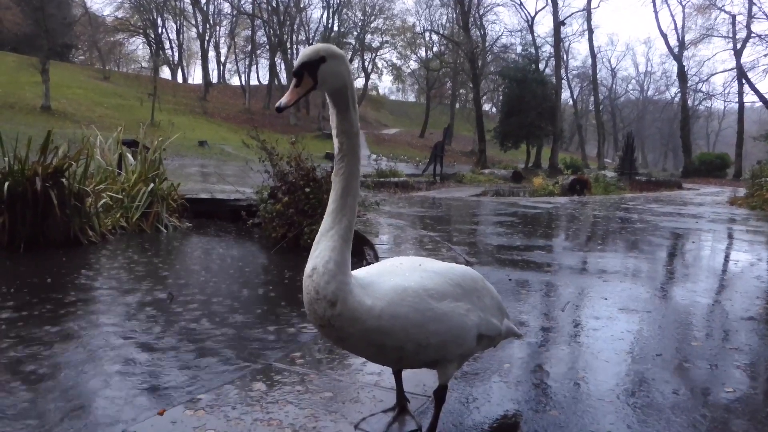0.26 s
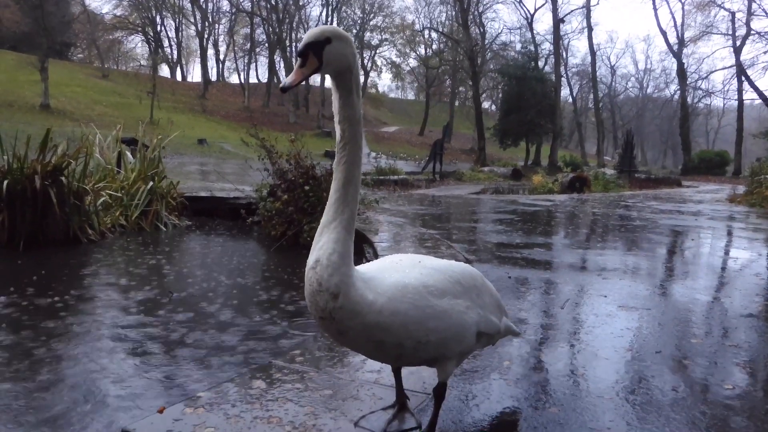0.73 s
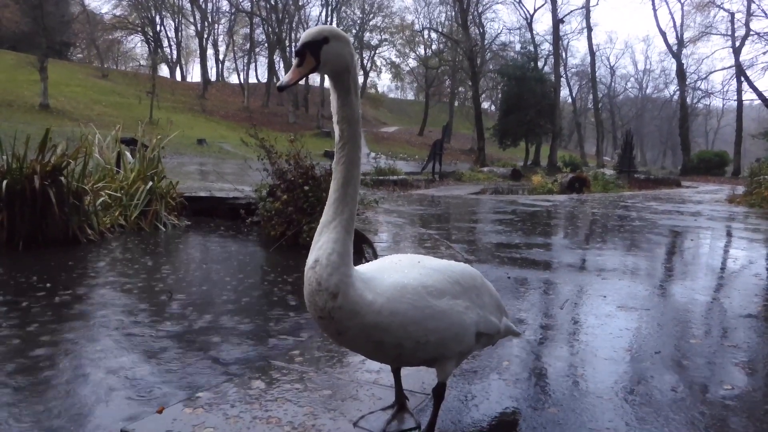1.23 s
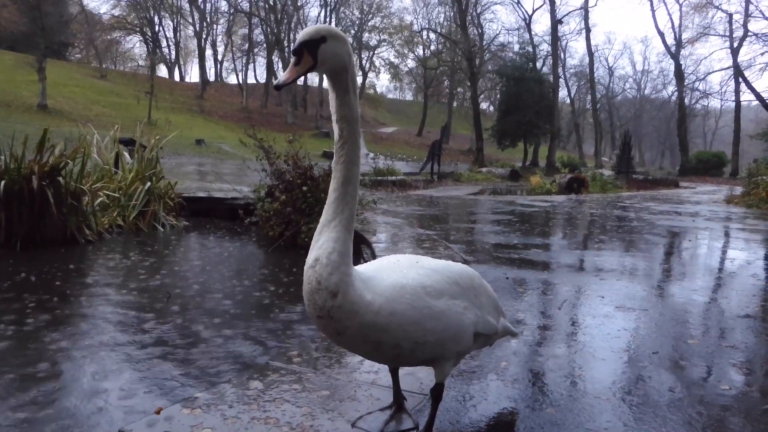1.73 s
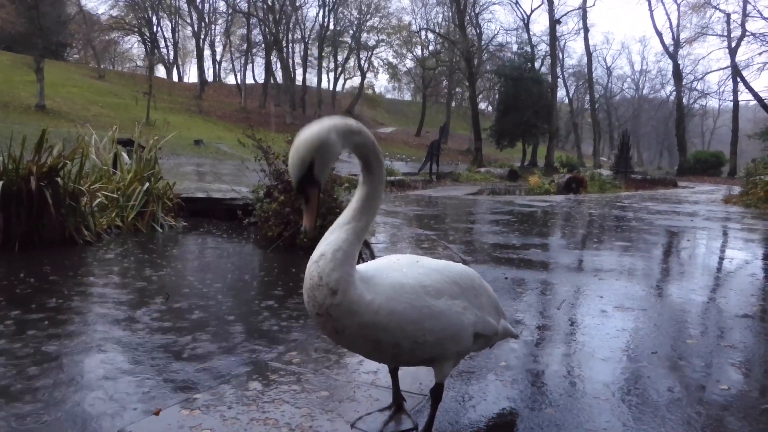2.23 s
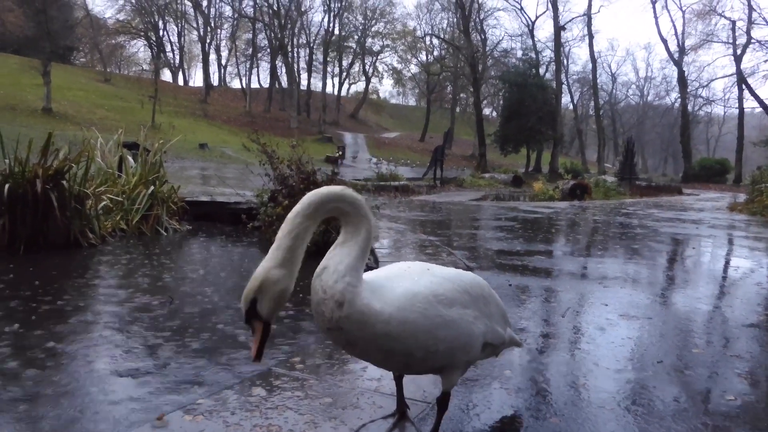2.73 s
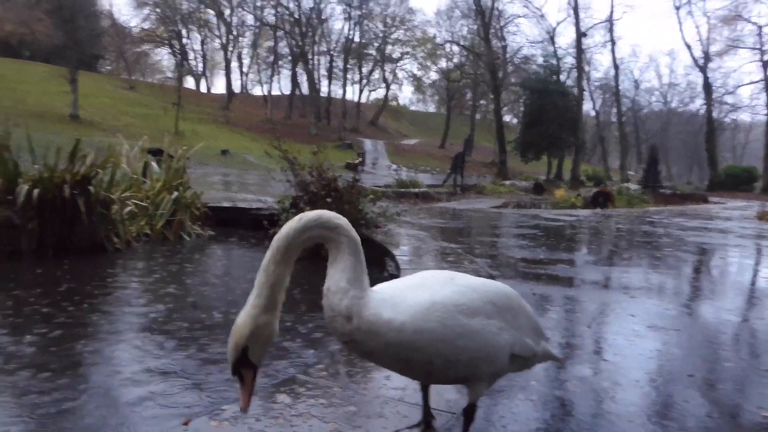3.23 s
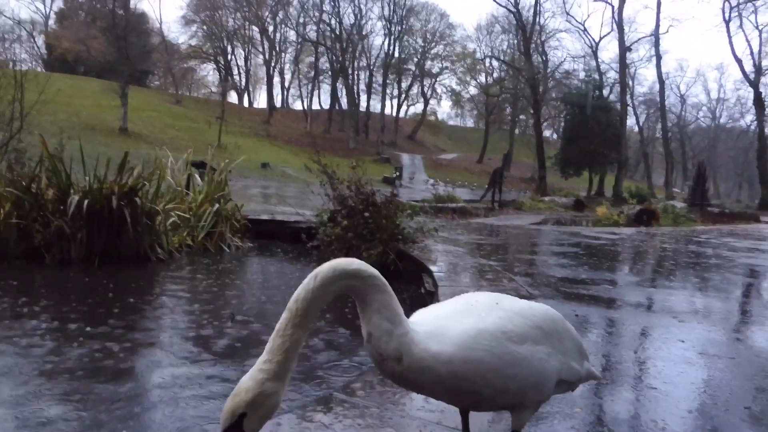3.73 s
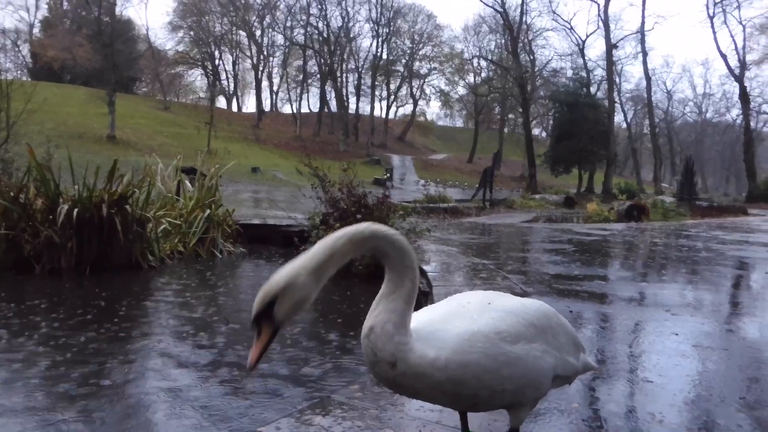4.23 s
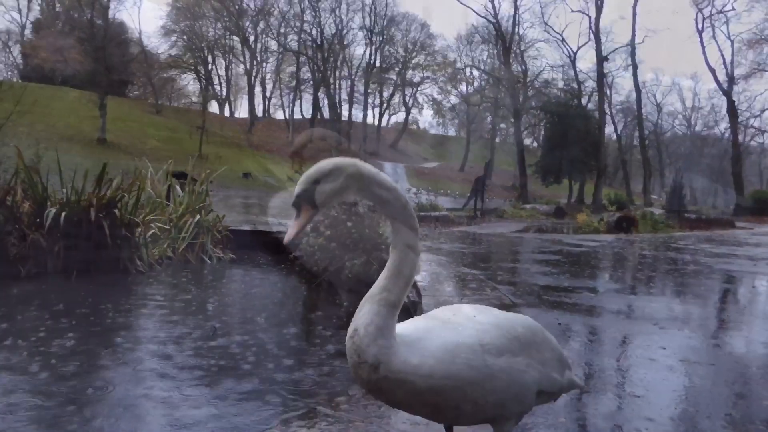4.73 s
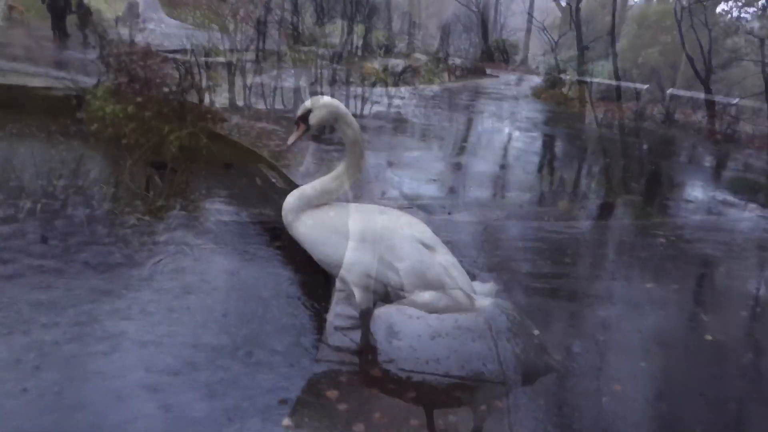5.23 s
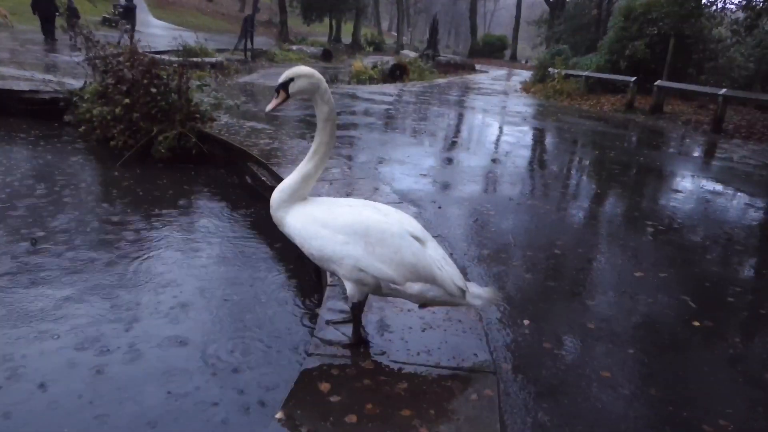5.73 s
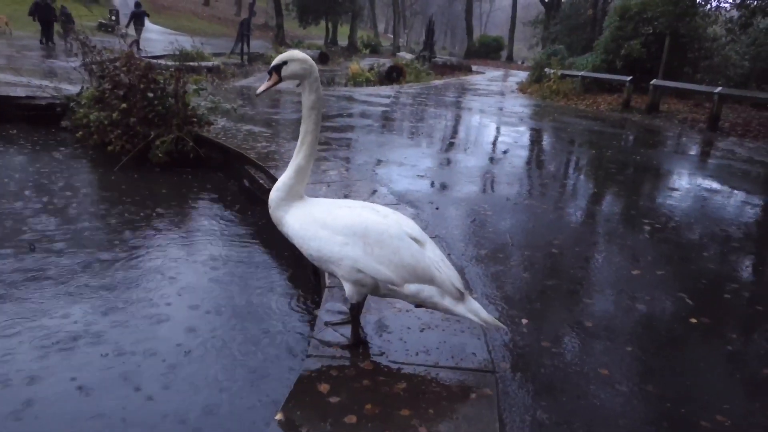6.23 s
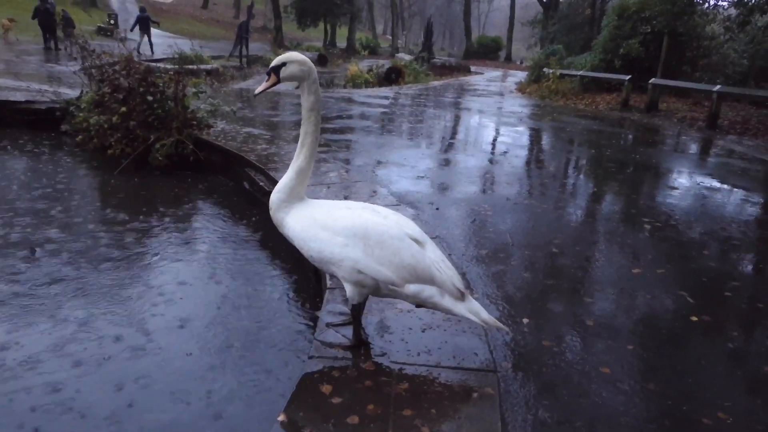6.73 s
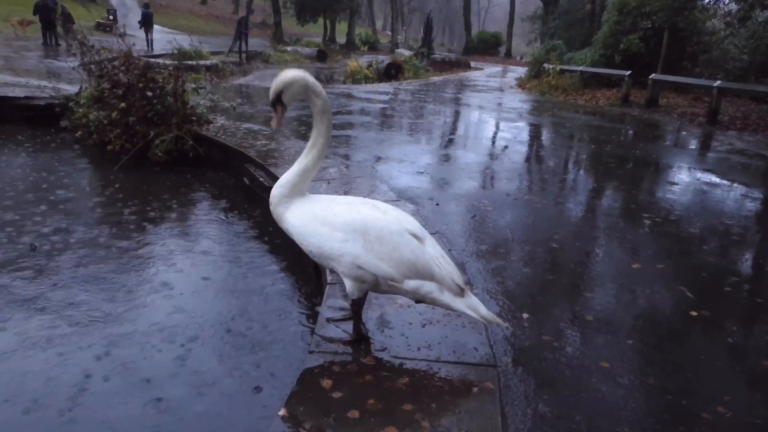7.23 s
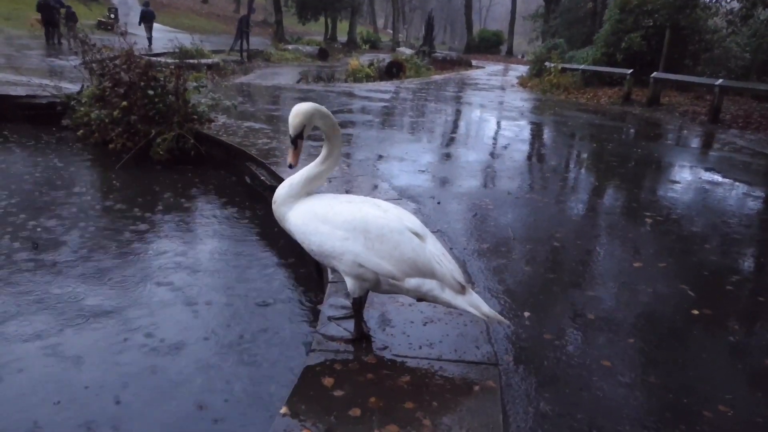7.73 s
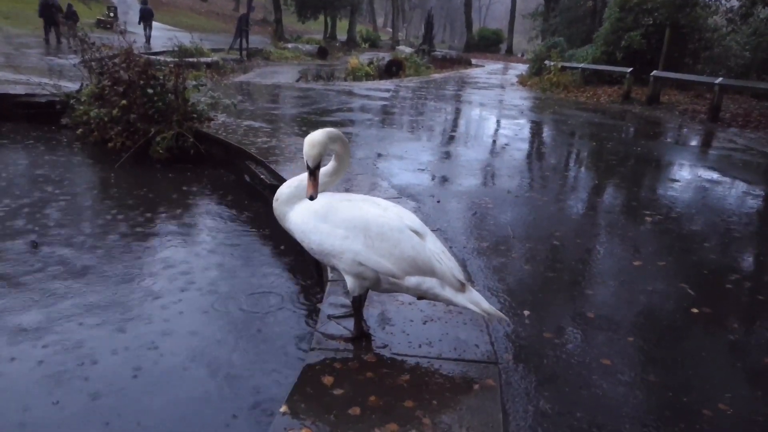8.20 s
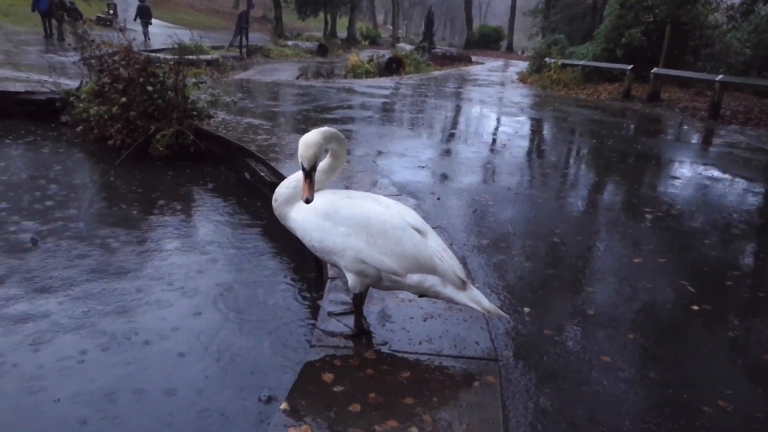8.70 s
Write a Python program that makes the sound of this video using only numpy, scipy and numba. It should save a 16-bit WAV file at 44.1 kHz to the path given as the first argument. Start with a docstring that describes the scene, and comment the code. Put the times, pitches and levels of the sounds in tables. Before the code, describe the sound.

Dense, crisp pattering of drops on stretched cloth right above the listener, over a soft continuous hiss of rain on water and pavement.

```python
"""Drops tap on an umbrella overhead while steady rain hisses all around, in a park beside a pond. Each tap on
the taut cloth is a low thump, a short ring and a bright tick, made of damped modes; the drops set at fixed
moments also burst into a spray of droplets. Shaped noise makes the hiss of countless drops on pavement and
water, the faint low rumble and the bright fizzes. Now and then a hollow flutter or a clear ping is heard. A
small camera under the umbrella hears it all in stereo."""
import sys
import numpy as np
from scipy import signal
from scipy.fft import rfft, irfft
from scipy.io import wavfile
from scipy.ndimage import uniform_filter1d
from numba import njit

SR = 44100
rng = np.random.default_rng(int(sys.argv[2]) if len(sys.argv) > 2 else 0)


def output_pcm(signal):
    """Save a mono or channel-first signal as 16-bit PCM at the path in sys.argv[1].

    Samples are clipped to [-1, 1] before scaling.
    """
    pcm = np.clip(np.atleast_2d(signal).T, -1, 1) * 32767
    wavfile.write(sys.argv[1], SR, np.round(pcm).astype(np.int16))


N = 395136


def undb(db):
    """Gain of a level in dB."""
    return 10 ** (np.asarray(db) / 20)


def at(table, hz):
    """A spectrum table read on a log-frequency axis."""
    table_hz, value = np.transpose(table)
    return np.interp(np.log(hz), np.log(table_hz), value)


def level_over_time(table):
    """Gain of every sample, from a table of times and levels joined by straight lines in dB."""
    s, db = np.transpose(table)
    return undb(np.interp(np.arange(N) / SR, s, db))


def filtered(sound, order, edge_hz, kind):
    """Sound through a filter with a flat passband."""
    return signal.sosfilt(signal.butter(order, edge_hz, kind, fs=SR, output="sos"), sound)


def walk(rate):
    """Random levels, rate of them per second, joined by smoothing twice."""
    hold = int(SR / rate)
    steps = np.repeat(rng.standard_normal(N // hold + 1), hold)
    return 1.8 * uniform_filter1d(uniform_filter1d(steps, hold), hold)[:N]


# loudness of the distant rumble: (time [s], level [dB])
RUMBLE_LEVEL = [(0, -85), (1.8, -79.5), (5, -85), (8.4, -83)]


def rumble(side_db=-20.0):
    """A faint distant rumble of low noise, nearly the same left and right."""
    mid, side = filtered(rng.standard_normal((2, N)), 2, [45., 105.], "bandpass")
    stereo = mid + undb(side_db) * side * np.array([[1], [-1]])
    return stereo / np.std(mid) * level_over_time(RUMBLE_LEVEL)


# how strongly it rains, which also guides the patter: (time [s], level [dB])
RAIN_LEVEL = [(0, -46), (1, -44.5), (2.5, -45.5), (4.1, -45), (4.7, -46.5), (5.2, -47), (5.33, -45.5),
              (5.35, -50.5), (5.41, -46.5), (5.45, -45.5), (5.6, -44.5), (7.5, -45.5), (8.96, -44.5)]
# tone colour of the hiss, as relative strength per Hz: (frequency [Hz], level [dB])
HISS_COLOUR = [(15, -62), (25, -48), (119, -28.5), (260, -16), (600, -14), (1630, -3), (3100, 1),
               (4410, -1), (7350, -11.5), (9620, -22.5), (15600, -38)]
# stereo width of the hiss, side minus mid: (frequency [Hz], level [dB])
HISS_WIDTH = [(60, -16), (160, -13), (450, -9), (800, -11), (1400, -21), (2600, -25), (3900, -22),
              (5200, -9), (8100, -1), (15000, 1)]
# stereo balance of hiss and drops, left minus right: (frequency [Hz], level [dB])
BALANCE = [(60, 0), (1300, .1), (2400, .4), (4000, 1.3), (5300, 3.2), (8100, 6), (15000, 3.5)]


def hiss(swell_db=0.77, flicker_db=1.5, extra_bass_flicker_db=1.2):
    """Distant rain merges into noise; its octaves swell together and flicker alone, the bass most."""
    bins = np.fft.rfftfreq(N, 1 / SR) + 1  # the 1 Hz keeps the logarithm finite
    mid, side = (rfft(rng.standard_normal(N)) * undb(at(HISS_COLOUR, bins)) for _ in range(2))
    side = side * undb(at(HISS_WIDTH, bins))
    lean = undb(at(BALANCE, bins) / 2)
    stereo = np.array([(mid + side) * lean, (mid - side) / lean])
    out, swell = 0, walk(11)
    octaves = np.log2(bins / 25)
    for k in range(11):
        # neighbouring octaves crossfade
        band = irfft(stereo * np.clip(1 - np.abs(octaves - k), 0, 1), N)
        flicker = (flicker_db + extra_bass_flicker_db * (k < 6)) * walk(16)
        out = out + band * undb(swell_db * swell + flicker)
    out = out / np.sqrt(np.mean(out ** 2))
    return out * undb(-0.5) * level_over_time(RAIN_LEVEL)  # half a dB under the rain table


# short bright fizzes, at their loudest moment: (time [s], rms level [dB])
FIZZ_MOMENTS = [(1.3, -55), (3.63, -52), (4.255, -50), (6.38, -51), (6.74, -54), (7.33, -54), (8.91, -53)]


def fizz(fade_s=.016):
    """Brief swells of top-treble noise, unrelated left and right."""
    noise = filtered(rng.standard_normal((2, N)), 2, [8000., 12500.], "bandpass")
    t = np.arange(N) / SR
    swells = sum(undb(db) * np.exp(-np.abs(t - s) / fade_s) for s, db in FIZZ_MOMENTS)
    return noise / np.std(noise) * swells


@njit
def ring(n, start, hz, t60, left, right, rise):
    """Damped modes; each swells over the contact time and first pulls the pressure down."""
    out = np.zeros((2, n))
    for k in range(len(start)):
        turn = np.exp((2j * np.pi * hz[k] - np.log(1000) / t60[k]) / SR)  # one sample of ringing
        z, push = 1. + 0j, 1.
        for i in range(start[k], min(n, start[k] + int(t60[k] * SR))):
            z, push = z * turn, push * rise
            out[0, i] -= left[k] * (1 - push) ** 2 * z.imag
            out[1, i] -= right[k] * (1 - push) ** 2 * z.imag
    return out


# basic modes of the cloth, varied at each blow:
# (frequency [Hz], level [dB], time to fade by 60 dB [s])
CLOTH_MODES = [(278, -2, 0.029), (392, 0.5, 0.011), (505, 0.5, 0.02), (750, 2.5, 0.015), (1206, -6, 0.0049),
               (1725, -7.5, 0.0064), (2370, -6, 0.0059), (3070, -9, 0.0077), (4030, -9, 0.0083),
               (5585, 3, 0.0068), (7640, -5, 0.0072), (9500, -7.5, 0.0042), (12000, -26, 0.0016)]
# typical stereo width of the drops, side minus mid: (frequency [Hz], level [dB])
DROP_WIDTH = [(60, -26), (450, -30), (800, -33), (1400, -34), (2400, -25), (4400, -14), (8100, -8),
              (15000, -1)]
THUMP_TOP_HZ, TICK_FOOT_HZ = 800, 5000  # modes below are thump, modes above are tick
RING_DB = -1  # the mode that a blow favours, relative to the drop's level


def taps(s, db, ring_hz, thump_db, tick_db, ring_t60, sustain, uneven_db=3.5, detune=0.11, contact_s=.00009):
    """Each blow lands on another spot, so the cloth's modes get new strengths and slightly new pitches."""
    hz, mode_db, t60 = np.transpose(CLOTH_MODES)
    blows, is_tick = len(s), hz > TICK_FOOT_HZ
    chance = rng.standard_normal((blows, len(hz) + 1, 3))
    share = mode_db + np.outer(thump_db, hz < THUMP_TOP_HZ) + np.outer(tick_db, is_tick)
    # the harder the tick, the higher it reaches
    tilt = np.maximum(np.log2(hz / 7000), -1) * is_tick
    share += 1.1 * np.outer(np.maximum(tick_db + 11.5, 0), tilt)
    share += uneven_db * np.tanh(chance[:, :-1, 0])
    # the favoured mode joins as the last column
    share = np.column_stack([share, np.full(blows, RING_DB)])
    pitch = np.column_stack([hz * np.exp(detune * chance[:, :-1, 1]), ring_hz])
    decay = np.column_stack([np.tile(t60, (blows, 1)), ring_t60])
    dryness = np.where(tick_db > -6, .5, 1)  # the hardest ticks are the driest
    decay = decay * (sustain * dryness)[:, None]
    size = undb(db[:, None] + share)
    # each mode leans at random to one side, more widely in the treble
    side = undb(at(DROP_WIDTH, pitch)) * np.sign(chance[..., 2])
    lean = undb(at(BALANCE, pitch) / 2)
    left, right = size * (1 + side) * lean, size * (1 - side) / lean
    start = np.repeat((s * SR).astype(int), len(hz) + 1)
    rise = np.exp(-1 / (contact_s * SR))
    return ring(N, start, pitch.ravel(), decay.ravel(), left.ravel(), right.ravel(), rise)


# soft hollow flutters; each pulse adds a little random level and pitch:
# (start time [s], length [s], frequency [Hz], lowest pulse level [dB])
FLUTTER_RUNS = [(1.712, 0.041, 1420, -36), (2.53, .02, 1650, -39), (6.463, 0.026, 1740, -33),
                (6.598, 0.026, 1750, -32.5), (6.656, 0.026, 1260, -38), (7.598, 0.037, 1750, -35.5),
                (7.724, .04, 1640, -33.5), (6.965, 0.023, 1770, -33), (8.25, 0.042, 1760, -31),
                (8.394, 0.031, 1600, -35), (8.753, 0.025, 1770, -30.5)]


def flutters(count=8):
    """Uneven runs of quick, dull blows that keep roughly one pitch."""
    s, length, hz, db = np.repeat(np.transpose(FLUTTER_RUNS), count, axis=1)
    chance = rng.random((len(s), 3)).T
    step = (np.arange(len(s)) % count + 0.61 * chance[0]) / count
    dull, t60 = np.full(len(s), -30.), np.full(len(s), .008)
    pitch = hz * 1.1 ** (chance[2] - .5)
    return taps(s + length * step, db + 5 * chance[1], pitch, dull, dull, t60, np.ones(len(s)))


# clear pings of drops on something harder:
# (time [s], level [dB], frequency [Hz], time to fade by 60 dB [s])
PING_DROPS = [(0.876, -29, 2190, .016), (3.85, -28, 2230, 0.033), (7.862, -47, 686, 0.22),
              (8.3714, -26, 3370, 0.021)]


def pings():
    """A single mode rings out, with little thump or tick."""
    s, db, hz, t60 = np.transpose(PING_DROPS)
    dull = np.full(len(s), -35.)
    return taps(s, db, hz, dull, dull, t60, np.ones(len(s)))


def patter(over_rain_db, scatter_db, count):
    """Small drops at random moments that follow the rain; most are faint, a few stand out."""
    chance = rng.random((count, 6)).T
    s = chance[0] * N / SR
    stand_out_db = np.minimum(-scatter_db * np.log(1 - chance[1]), 12)
    db = np.interp(s, *np.transpose(RAIN_LEVEL)) + over_rain_db + stand_out_db
    ring_hz = 1300 * 2 ** (1.967 * chance[2])
    thump_db, tick_db = -40 + 30 * chance[3] ** 6, -22 + 14 * chance[4]
    ring_t60 = 0.0012 + 0.013 * chance[5] ** 3
    return taps(s, db, ring_hz, thump_db, tick_db, ring_t60, np.full(count, .75))


# drops on the cloth at set moments, from loud to faint; thump and tick relative to the drop's level: # (time
# [s], level [dB], ring frequency [Hz], thump level [dB], tick level [dB])
SET_DROPS = [(0.0689, -13.5, 2550, -23, -11), (0.1896, -17.5, 2620, -15.5, -10),
             (0.2046, -16, 3100, -14, -24), (0.4418, -28, 890, -8.5, -24), (0.4495, -25.5, 2570, -38, -26),
             (0.5138, -28, 1920, -8, -17), (0.5321, -15.5, 3060, -17, -13),
             (0.5586, -20.5, 2220, -17, -27), (0.639, -23, 1400, -12, -22), (0.6548, -18, 3160, -16, -31),
             (0.7665, -25, 2300, -14, -27), (0.8109, -15, 3400, -29, -25), (0.827, -19, 1950, -13.5, -19),
             (0.85, -15.5, 2780, -24, -7.5), (0.9083, -12, 2800, -21, -28), (0.916, -9, 2520, -18, -7),
             (0.956, -21.5, 2540, -19, -24), (1.028, -21.5, 2620, -41, -32), (1.0596, -23, 2310, -15, -30),
             (1.0728, -17, 2500, -21, -13), (1.145, -27, 2900, -6, -20), (1.171, -16.5, 2970, -17, -16),
             (1.2094, -18, 2330, -12.5, -13), (1.2268, -12.5, 4500, -23, -6),
             (1.2823, -14, 5300, -21.5, -10), (1.4085, -20.5, 3530, -18.5, -16),
             (1.5276, -12.5, 1830, -43, -6), (1.6023, -24, 2090, -9, -8),
             (1.6138, -13.5, 2060, -21.5, -15), (1.6441, -9.5, 2570, -13.5, -11.5),
             (1.8684, -24, 2370, -31, -10), (1.9009, -13.5, 2970, -19, -19),
             (1.9073, -13, 3930, -19.5, -22), (1.9255, -14.5, 3140, -32, -18),
             (1.9755, -19, 1000, -17, -9), (2.1167, -21.5, 3210, -11, -15.5), (2.2025, -9, 3160, -26, -19),
             (2.2134, -18, 3220, -33, -22), (2.2255, -19.5, 1000, -11, -7),
             (2.2715, -17.5, 3850, -20, -27.5), (2.5023, -16.5, 5300, -21, 0.5),
             (2.5556, -36.5, 900, 1.5, -19), (2.605, -38, 900, -0.5, -16),
             (2.674, -11.5, 2850, -17.5, -24), (2.7309, -12, 2750, -33, -13),
             (2.8139, -18, 3180, -15.5, -32), (2.8846, -10.5, 2720, -21.5, -10),
             (2.927, -21.5, 3490, -39, -18.5), (2.9346, -22, 3620, -36, -16),
             (2.9766, -8.5, 3900, -24, -26), (2.9994, -12, 2580, -15, -13), (3.0125, -19, 1970, -18, -25),
             (3.1339, -12, 1930, -17, -18.5), (3.1502, -17, 2470, -12, -19), (3.2033, -24, 910, -7, -32),
             (3.3738, -24.5, 2840, -5.5, -25), (3.3993, -20.5, 3040, -29, -28),
             (3.4734, -19.5, 2640, -17, -26), (3.525, -42, 890, 4, -24.5), (3.5612, -25, 2700, -40, -20),
             (3.5704, -21.5, 2780, -21, -25), (3.6305, -13, 4480, -26, -0.5),
             (3.655, -36, 1200, -2.5, -15), (3.7064, -14, 1980, -11, -37), (3.728, -22.5, 880, -11, -14),
             (3.7694, -27.5, 2380, -30, 8.5), (3.8236, -25, 3910, -36, -1),
             (3.8853, -14, 2600, -24, -19.5), (3.974, -36, 1100, -7, -14), (3.986, -38, 1000, -11, -23),
             (4.0804, -16.5, 2360, -22, -27), (4.123, -30, 1560, -5.5, -20), (4.1678, -21, 1700, -16, -14),
             (4.1742, -17, 1740, -23, -30), (4.2052, -12.5, 3100, -19, -6),
             (4.3979, -10.5, 2700, -41, -22), (4.456, -19, 3640, -39, -13), (4.5006, -20, 4430, -24, -24),
             (4.6592, -16, 2720, -15, -27), (4.7812, -24, 1800, -15, -16), (4.7998, -38, 900, 2, -21),
             (4.8963, -23, 2860, -23, -25), (4.9168, -13, 2290, -23, -9), (4.939, -22, 2090, -14, -26),
             (4.962, -21.5, 3380, -6, -26), (4.9896, -18, 4070, -27, -6), (5.0227, -21, 1960, -26, -23),
             (5.2141, -16, 2700, -15, -7), (5.2827, -22.5, 3620, -18, -28),
             (5.3104, -12.5, 3600, -23, -15.5), (5.4255, -21.5, 1180, -11, -15),
             (5.4306, -11, 2340, -38, -33), (5.4908, -21.5, 2490, -13, -25),
             (5.503, -17.5, 1340, -11.5, -13), (5.5192, -15.5, 1660, -23, -8),
             (5.5739, -18, 3580, -13, -14), (5.6388, -20.5, 3450, -33, -28),
             (5.7059, -18.5, 3100, -38, -16), (5.7723, -14, 2980, -14.5, -25),
             (5.8772, -23.5, 1080, -10, -14), (5.9313, -6.5, 2920, -22.5, -22),
             (6.109, -23, 1800, -33, -25), (6.1645, -21, 1790, -36, -13.5),
             (6.1747, -18, 3200, -13.5, -16), (6.2818, -16, 1630, -14, -27),
             (6.311, -24.5, 2300, -10, -22), (6.4507, -11.5, 3260, -29, -17),
             (6.5057, -22.5, 2000, -11.5, -7), (6.6248, -18, 2820, -23, -18),
             (6.643, -17.5, 2660, -14, -19), (6.652, -22, 2630, -25, -18), (6.7357, -27, 4760, -43, 8.5),
             (6.8919, -18.5, 3480, -42, -15), (7.0156, -7.5, 2800, -24, -7.5),
             (7.1685, -14, 2200, -11, -20), (7.26, -13.5, 3360, -16, -6.5), (7.322, -20, 5600, -43, 9),
             (7.3675, -22, 3280, -14.5, -24), (7.396, -20.5, 970, -13, -6.5),
             (7.4062, -20.5, 2700, -37, -13), (7.5749, -13, 2770, -19.5, -24),
             (7.6173, -17, 2960, -9.5, -15), (7.6404, -18.5, 2140, -39, -22),
             (7.7201, -19.5, 3140, -11, -24), (7.7707, -19, 3100, -39.5, -23),
             (7.816, -18.5, 1630, -12, -13), (7.9467, -24, 1920, -31, -24),
             (8.0305, -22.5, 2270, -14, -12), (8.0903, -14.5, 1650, -13, -7), (8.102, -23, 1000, -22, -20),
             (8.1231, -14.5, 2160, -16.5, -14), (8.219, -15.5, 1760, -17, -8),
             (8.2405, -21, 1360, -29, -18), (8.2837, -19, 1890, -15, -27), (8.4282, -15.5, 2710, -21, -13),
             (8.4773, -26, 1390, -8, -22), (8.511, -13, 2130, -16.5, -6), (8.6524, -17, 3100, -40, -15),
             (8.6651, -13, 2100, -15, -14), (8.9104, -8, 3550, -33, -5.5), (8.946, -19, 2540, -9, -16),
             (8.9559, -11.5, 2870, -33, -18), (4.668, -22, 2780, -30, -17),
             (1.8652, -21.5, 4830, -30, -24), (1.939, -20, 2580, -22, -14), (2.2753, -26, 1700, -20, -22),
             (4.727, -35, 2400, -25, -22), (4.877, -30.5, 2000, -11, -22), (7.672, -29, 1400, -16, -24),
             (0.2341, -22, 4110, -40, -21), (0.3086, -29, 2540, -20, -21), (0.3355, -24.5, 2370, -29, -9),
             (0.6656, -27, 3360, -14, -17), (1.0928, -26, 1420, -23, -15), (1.1142, -25, 1920, -10, -13),
             (1.162, -22, 1770, -16, -8), (1.2721, -29, 2390, -7, -14), (1.3277, -21.5, 5080, -40, -6),
             (1.7402, -24, 2640, -16, -25), (2.0182, -28, 2520, -20, -1), (2.1301, -25, 1850, -16, -19),
             (2.538, -29, 1600, -35, -19), (2.6615, -28, 1740, -37, -14), (2.7184, -24.5, 4520, -14, -10),
             (2.7674, -30, 1440, -32, -23), (2.8523, -35.5, 900, -8, -23), (2.8609, -25, 2270, -40, -26),
             (3.0343, -24, 2410, -29, -28), (3.2301, -23, 1940, -28, -15), (3.4877, -26, 2630, -20, -19),
             (3.9005, -26, 4300, -35, -14), (3.9055, -24, 3300, -35, -20), (3.9258, -27, 2200, -18, -24),
             (4.0322, -24, 3320, -29, -20), (4.1487, -25, 1290, -12, -20), (4.4783, -25, 2410, -22, -17),
             (4.5101, -25.5, 1830, -24, -21), (4.5226, -30, 1020, -15, -14), (4.6753, -33, 1030, -2, -17),
             (4.7539, -32, 2760, -7, -20), (4.8375, -25.5, 2130, -29, -23), (5.0049, -23, 2520, -28, -21),
             (5.0573, -31, 1540, -40, -15), (5.1653, -26, 2870, -22, -18), (5.2624, -27, 2760, -32, -21),
             (5.2707, -22.5, 3080, -16, -11), (6.944, -31, 2300, -35, -25), (5.7867, -29, 2430, -12, -20),
             (5.9501, -21, 1860, -17, -23), (5.9643, -23.5, 3100, -13, -26),
             (6.0333, -21.5, 1850, -41, -11), (6.0572, -27, 2610, -39, -25), (6.2505, -25, 2890, -33, -11),
             (6.2699, -23, 2560, -31, -12), (6.4001, -21.5, 3180, -24, -19), (6.4409, -23, 2150, -31, -23),
             (6.6915, -28, 1920, -26, -10), (6.703, -26, 2500, -30, -16), (6.722, -25.5, 3170, -27, -20),
             (6.751, -24.5, 3340, -40, -25), (6.8595, -28, 2300, -25, -9), (6.8809, -21.5, 3600, -34, -26),
             (7.1, -27, 2350, -35, -20), (7.222, -25, 3640, -36, -16), (7.377, -24, 2140, -27, -25),
             (7.4927, -27, 2020, -28, -25), (7.5407, -26.5, 1360, -11, -8), (7.667, -30, 1550, -17, -13),
             (7.6843, -27.5, 1770, -19, -12), (7.7276, -27, 1980, -24, -20), (7.9132, -24, 2600, -13, -9),
             (7.9639, -30, 2000, -27, -19), (8.0457, -25.5, 1830, -29, -24), (8.1347, -24, 2970, -18, -13),
             (8.1429, -26, 2450, -23, -18), (8.4348, -23, 3170, -13, -24), (8.4999, -28, 1870, -24, -23),
             (8.5461, -22.5, 2970, -40, -26), (8.5859, -25, 3300, -26, -24),
             (8.6373, -25.5, 1530, -31, -12), (8.7136, -23.5, 2780, -15, -3),
             (8.8143, -23, 1920, -24, -14), (8.8237, -28.5, 1870, -34, -23),
             (8.8316, -22.5, 3450, -40, -24)]


def spray(spray_db=-20.5, spread_s=0.008, count=24):
    """Each drop from the table bursts into droplets that land again; later ones tend to be weaker."""
    s, db, _, thump_db, tick_db = np.transpose(SET_DROPS)
    chance = rng.random((len(s), count, 3))
    late = .001 - spread_s * np.log(1 - chance[..., 0])  # seconds after the blow
    size = db[:, None] + spray_db - 300 * late - 2.6 * np.log(1 - .97 * chance[..., 1])
    ring_hz = 1600 * 2 ** (1.825 * chance[..., 2])
    thump = np.repeat(thump_db - 2.5, count)
    tick = np.repeat(np.minimum(tick_db + 14.5, -10), count)
    ring_t60, sustain = np.full(size.size, .004), np.full(size.size, .8)
    return taps((s[:, None] + late).ravel(), size.ravel(), ring_hz.ravel(), thump, tick, ring_t60, sustain)


def set_drops(cycles=13.15, hard=0.22, drying=0.045):
    """The drops set in the table strike the cloth; the weaker the blow, the sooner its modes die away."""
    s, db, hz, thump_db, tick_db = np.transpose(SET_DROPS)
    # a softer blow, with less tick, lets the favoured mode ring longer
    ring_t60 = cycles / np.maximum(hz, 1500) * undb(-hard * np.clip(tick_db + 16, -5, 10))
    sustain = np.minimum(undb(drying * (db + 8.5)), 1)
    return taps(s, db, hz, thump_db, tick_db, ring_t60, sustain)


def scene():
    """Drops overhead and rain all round; the taps on the cloth carry little bass and little of the very top."""
    # the finest drops carry no low tone
    fine = filtered(patter(3.4, 2.96, count=5000), 2, 650., "highpass")
    cloth = flutters() + pings() + fine + patter(5.9, 2.15, count=900) + spray() + set_drops()
    cloth = filtered(cloth, 3, 208., "highpass")
    cloth = filtered(cloth, 1, 956., "highpass")
    cloth = filtered(cloth, 2, 8700., "lowpass")
    return rumble() + hiss() + fizz() + cloth


def record(dry, top_hz=15790):
    """The camera cuts the very top of the treble with a steep filter."""
    return signal.sosfilt(signal.ellip(10, .2, 70, top_hz, fs=SR, output="sos"), dry)


dry = scene()
out = record(dry)
output_pcm(out)
```